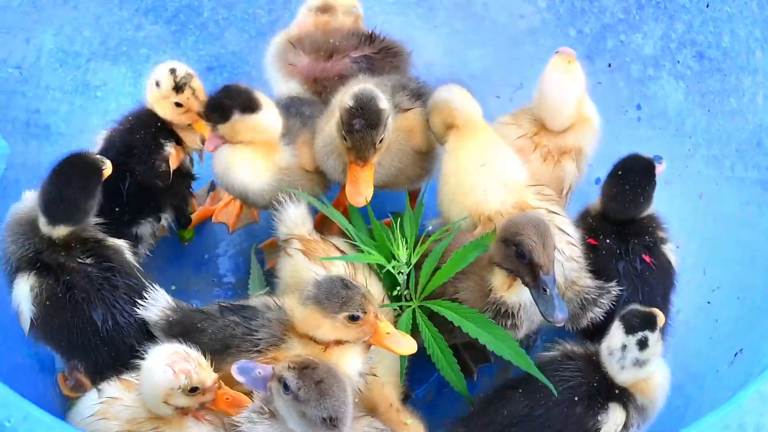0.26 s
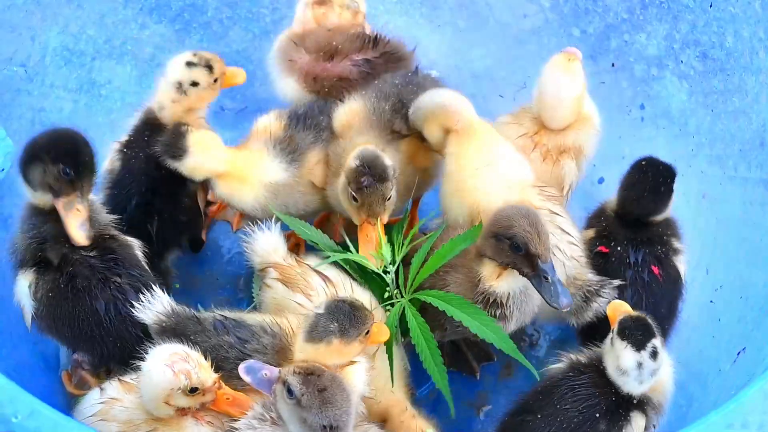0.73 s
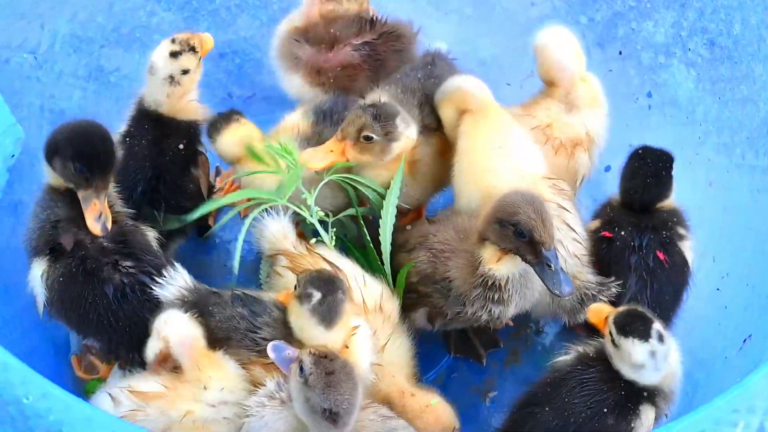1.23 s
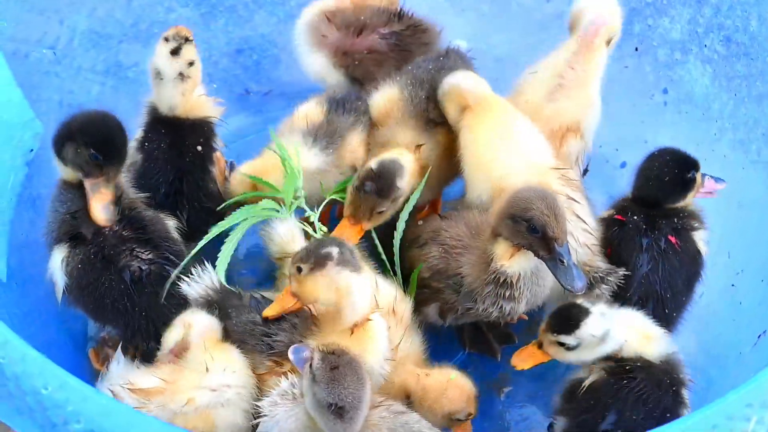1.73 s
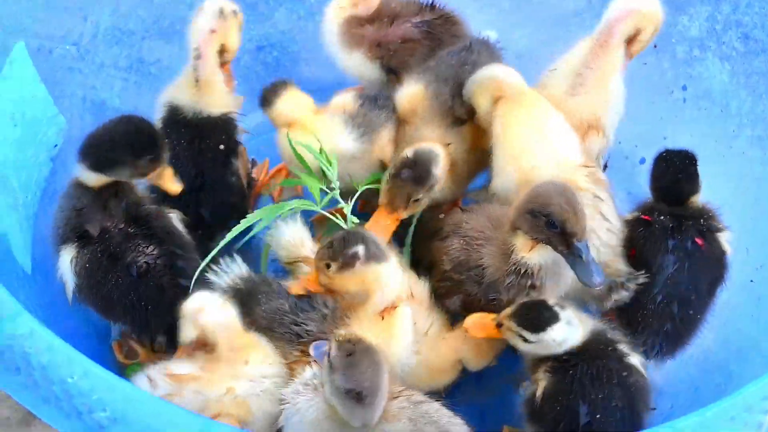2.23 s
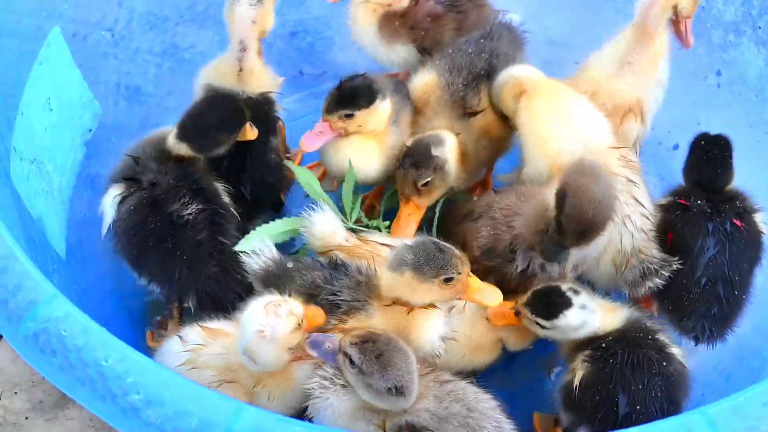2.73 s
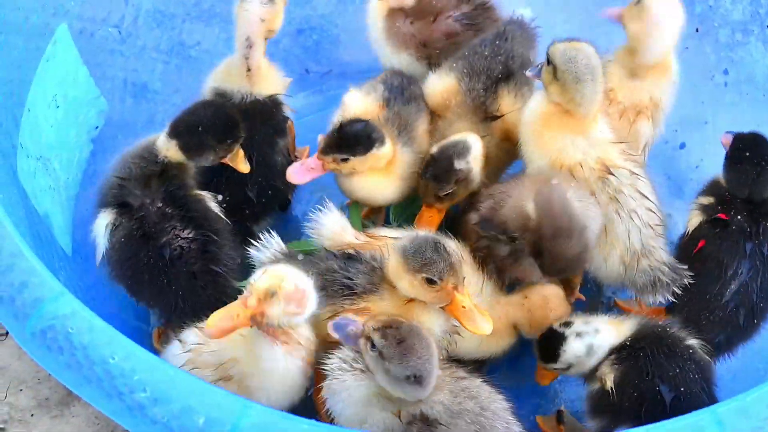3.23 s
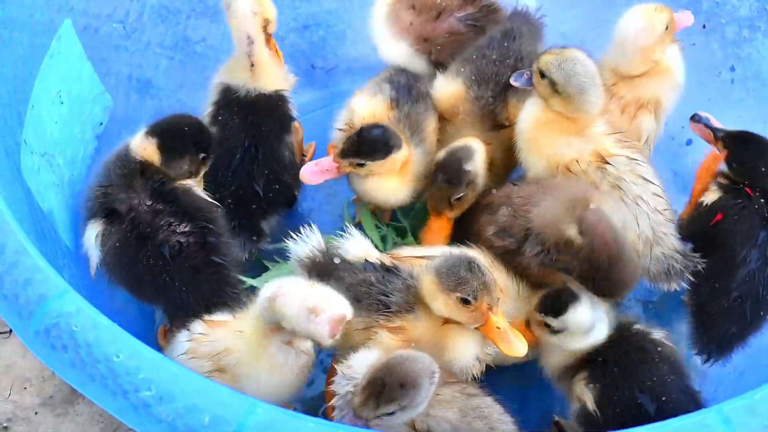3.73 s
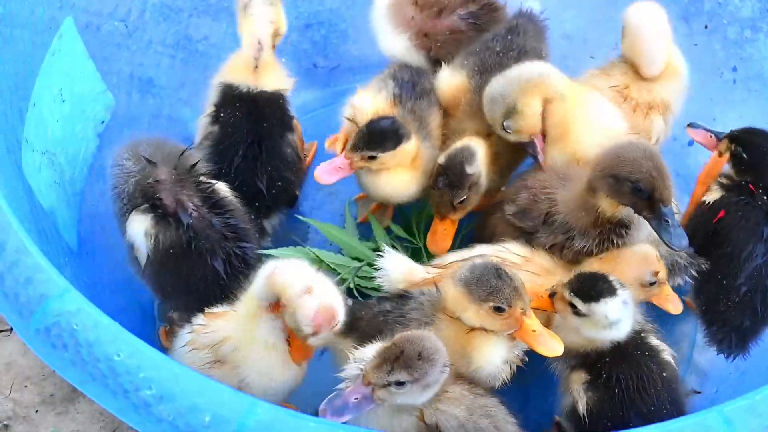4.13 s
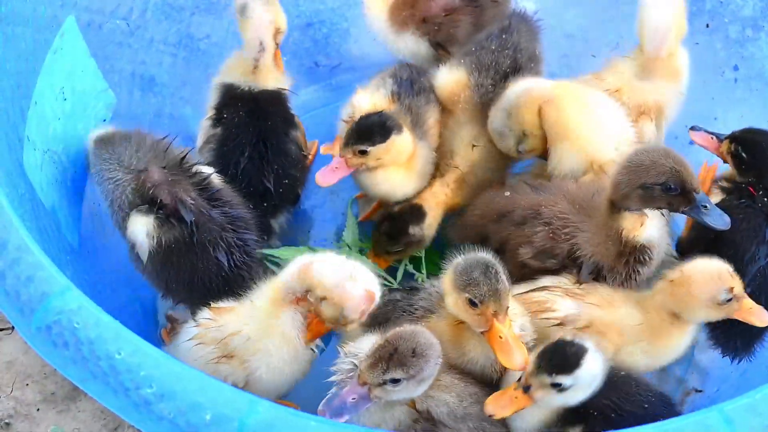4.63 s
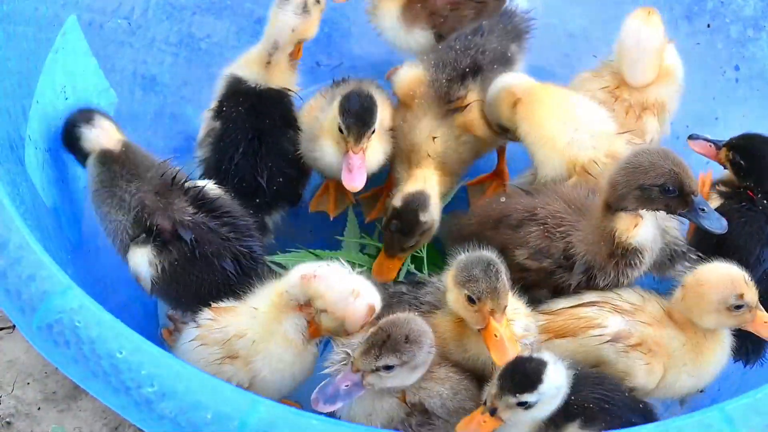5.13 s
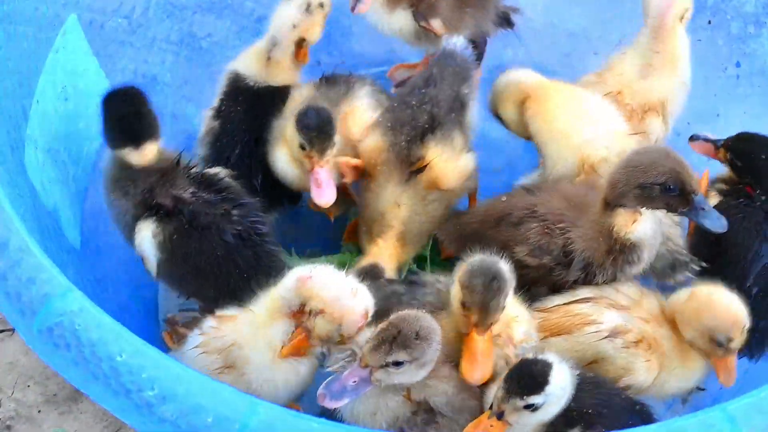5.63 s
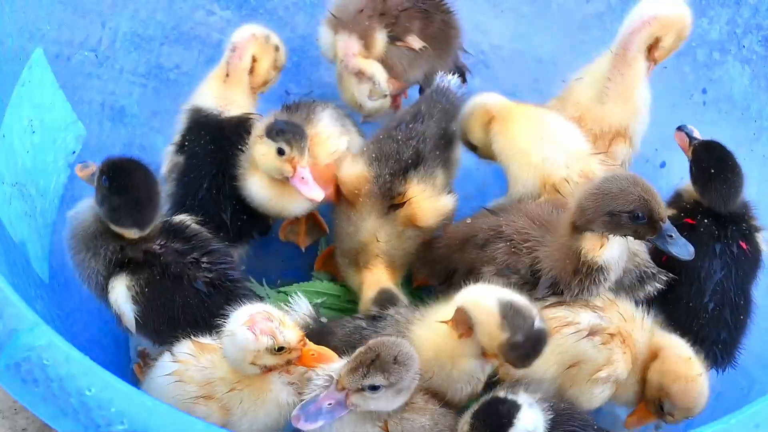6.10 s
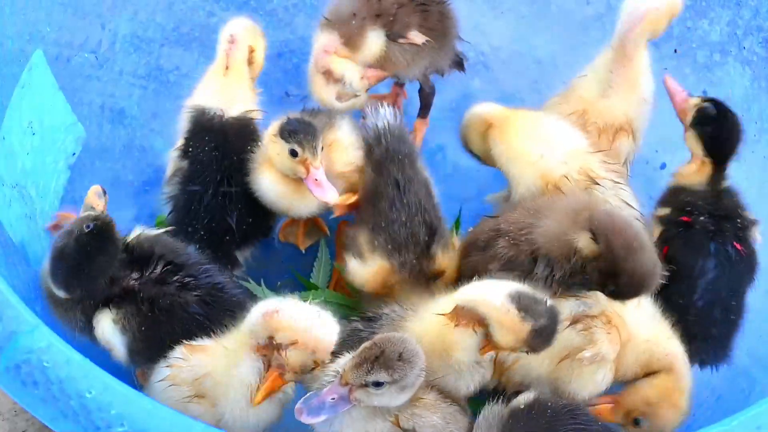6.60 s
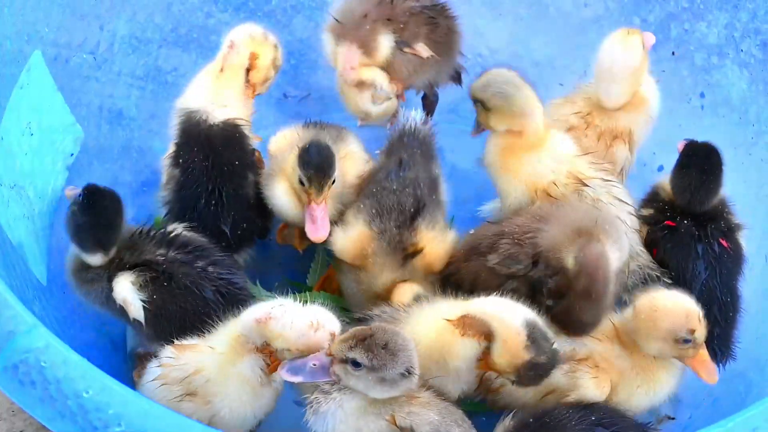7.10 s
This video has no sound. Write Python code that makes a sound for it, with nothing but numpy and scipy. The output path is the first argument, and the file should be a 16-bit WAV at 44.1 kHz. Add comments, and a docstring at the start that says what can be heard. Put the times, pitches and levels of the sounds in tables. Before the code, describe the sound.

A quiet yard with a very faint low motor hum and soft hiss. A weak hoarse duckling rasp comes at 0.4 s, then a rapid run of even, fizzy ticks from 0.7 to 1.3 s as the hiss swells and subsides. Hoarse, falling peeps on the right begin at 0.8 s, with warbles at 1.1 and 2.05 s; taps and a grainy scrape sound on the plastic tub, clearest around 2.0-2.4 s. Three bright squeaks follow at 2.9, 3.1 and 3.4 s, with a rasp between. From 3.15 s a distant songbird gives low buzzing trills, then from 3.7 s high hooked whistles, steady pipes, chips, sweeps and twirls, echoing softly. Hollow double taps come at 4.5 s. Around 6 s its notes drop; at 6.6 s a rougher trill coincides with a firm knock and snaps. Thin rising and slashing whistles continue to the end.

```python
"""Ducklings give arched, gliding and hoarse peeps in a plastic tub, with taps and scrapes on its wall.
A songbird some way off whistles high gliding notes and throbs low buzzing trills that the yard echoes.
Bright noise bursts make snaps and a run of even ticks; drifting sines hum as a distant motor.
Coloured noise makes the quiet yard and a broad hiss that swells briefly, then fades away."""
import sys
import numpy as np
from scipy import signal
from scipy.fft import rfft, irfft
from scipy.io import wavfile
from scipy.ndimage import uniform_filter1d

SR = 44100
rng = np.random.default_rng(int(sys.argv[2]) if len(sys.argv) > 2 else 0)


def persist_wave(psi):
    """Save psi, clipped to +-1, as 16-bit WAV."""
    counts = np.round(np.clip(psi, -1, 1) * 32767).astype(np.int16)
    wavfile.write(sys.argv[1], SR, np.atleast_2d(counts).T)


N = 324576  # length in samples


def ducklings():
    """Peeps, warbles and squeaks on the right and rasps in the centre, with the ring of tub and yard."""
    # arched peeps; the late ones near 6.5 and 6.9 s are probably the songbird's:
    # top t/s, start f/Hz, top f/Hz, fall/s, end f/Hz, level before pan/dB, hoarseness/rad
    arches = [(0.841, 3310, 3310, 0.1, 1940, -56.5, 1.2), (1.28, 2423, 3026, 0.055, 2266, -50, 1.4),
              (1.716, 3000, 3070, .07, 2150, -62, 0.96), (1.813, 2056, 2750, 0.026, 2090, -53.5, .3),
              (1.876, 1950, 2290, 0.014, 2030, -50.5, .3), (2.644, 2564, 3213, 0.065, 2310, -51.5, 1.56),
              (5.925, 2350, 2690, 0.024, 2590, -67.5, 0.23), (5.986, 2630, 2820, 0.015, 2320, -54, 0.12),
              (6.539, 1764, 2040, 0.014, 1860, -48, 0.23), (6.572, 3250, 4450, 0.011, 4270, -45.5, 0.42),
              (6.918, 2530, 3780, 0.015, 3580, -47.5, .3)]
    # warble falls from its top, then lifts: share of length, share of top pitch, relative level/dB
    warble = [(0, 0.71, -29), (.34, 1, -15), (.46, .88, 1), (.64, .74, 0), (.86, .78, 1), (1, .66, -9)]
    # when warbles come: t/s, length/s, top f/Hz, level before pan/dB
    warbles = [(1.111, .118, 3185, -45), (2.05, 0.117, 3293, -45.5)]
    # squeak creeps in, bursts out past its top, slides down: share of length, share of top pitch, level/dB
    squeak = [(0, .85, -30.5), (.36, 1, -22), (.44, 0.97, -2.5), (.8, .9, -3), (1, .78, -13.5)]
    # when squeaks come: t/s, length/s, top f/Hz, level before pan/dB
    squeaks = [(2.895, 0.065, 3255, -41.5), (3.126, 0.1, 3200, -39), (3.446, 0.058, 3133, -41.5)]
    # hoarse rasps: t/s, length/s, starting pitch/Hz, level/dB
    rasps = [(0.424, .11, 1400, -55.5), (3.229, 0.12, 1360, -50.5)]

    out = np.zeros((2, N))
    calls = [peep(*row) for row in arches]
    calls += [(sung(warble, *row), 0.2) for row in warbles]
    calls += [(sung(squeak, *row), 0.2) for row in squeaks]
    for glide, hoarse in calls:
        start, sound = whistle(glide, octave_db=-29.5, flutter_db=2.5, hoarse=hoarse)
        add(out, start, sound, pan_db=-8)
    for s, *shape in rasps:
        add(out, s, rasp(*shape))
    return out + amp(-8) * echoes(out, t60=0.41, delay=0.0091, same=0.12)


def peep(top_s, from_hz, top_hz, fall_s, to_hz, db, hoarse):
    """The arch of a peep: pitch rounds off at the top and falls ever faster."""
    climb_s, bend = 0.022, 1.4
    up = np.linspace(-1, 0, 5)[:-1]
    down = np.linspace(0, 1, 9)
    climb_hz = top_hz + (from_hz - top_hz) * abs(up) ** bend
    fall_hz = top_hz + (to_hz - top_hz) * down ** bend
    # loudest a fifth of the way down the fall
    shape_db = np.interp(np.r_[up, down], [-1, 0, 0.2, 1], [-9.5, -2.5, 0, -8.5])
    times = top_s + np.r_[climb_s * up, fall_s * down]
    return np.c_[times, np.r_[climb_hz, fall_hz], db + shape_db], hoarse


def rasp(length, hz, db):
    """A hoarse call: stacked harmonics of a sagging pitch, each blurred and fluttering on its own."""
    # second to fifth harmonic: mean level/dB
    harmonic_db = [1, -2, -1, -4]
    t = np.arange(0, length, 1 / SR)
    turn = 2 * np.pi * np.cumsum(hz * (1 - 0.34 * t)) / SR
    stack = np.zeros(len(t))
    for harmonic, g in enumerate(harmonic_db, start=2):
        flutter = amp(g + 4 * wobble(len(t), size=150))
        stack += flutter * np.sin(harmonic * turn + 1.3 * wobble(len(t), size=50))
    return amp(db) * np.sin(np.pi * (t / length) ** 0.65) * stack


def whistle(rows, octave_db, flutter_db, hoarse):
    """A gliding near-sine with its octave; slow flutter of level and quick phase hoarseness blur it."""
    s, hz, db = np.transpose(rows)
    t = np.arange(s[0] - 0.005, s[-1] + 0.0025, 1 / SR)
    glide_hz = smooth(np.interp(t, s, hz), size=70)
    turn = 2 * np.pi * np.cumsum(glide_hz) / SR + hoarse * wobble(len(t), size=60)
    to_edge = np.minimum(t - t[0], t[-1] - t)
    edge = np.sin(np.pi / 2 * np.clip(to_edge / 0.0025, 0, 1)) ** 2  # 2.5 ms fades
    level_db = smooth(np.interp(t, s, db), size=70) + flutter_db * wobble(len(t), size=90)
    tone = np.sin(turn) + amp(octave_db) * np.sin(2 * turn)
    return t[0], np.sqrt(2) * amp(level_db) * edge * tone


def sung(shape, s, length, hz, db):
    """Fits a syllable to the time, length, pitch and level of one note."""
    return np.array(shape) * [length, hz, 1] + [s, 0, db]


def songbird():
    """Gliding whistled notes and low trills from afar, blurred by echoes."""
    # notes under each syllable name: t/s, length/s, pitch/Hz, level/dB
    song = { "hook": [(3.825, 0.074, 6900, -41.5), (3.94, 0.07, 6890, -43), (4.05, .075, 6940, -41.5)],
            "pipe": [(4.192, 0.081, 5106, -36.5), (4.322, 0.067, 5018, -35.5), (4.45, 0.087, 5030, -38.5),
            (6.152, 0.03, 5670, -48.5), (6.325, .025, 5830, -51)], "chip": [(4.588, 0.021, 4386, -39),
            (4.758, 0.019, 4140, -37.5), (4.938, 0.031, 4090, -38.5)], "tick": [(3.705, 0.022, 5440, -51),
            (6.515, 0.028, 5690, -54.5), (6.708, 0.027, 6620, -52), (6.945, 0.02, 6460, -54.5),
            (7.192, 0.028, 6420, -63.5)], "crest": [(4.625, 0.065, 6820, -43), (4.8, 0.051, 6780, -37.5),
            (4.988, .06, 6717, -37)], "sweep": [(5.128, .127, 6976, -38)],
            "twirl": [(5.355, 0.12, 5734, -41), (5.562, 0.13, 5735, -42.5), (5.78, .125, 5650, -44.5)],
            "drop": [(6.02, 0.068, 6490, -39), (6.186, 0.065, 6460, -40), (6.358, 0.07, 6480, -41)],
            "rise": [(6.752, 0.068, 5160, -45), (6.985, 0.065, 4940, -46.5), (7.23, .064, 5070, -48)],
            "slash": [(6.595, 0.058, 6620, -49), (6.817, 0.019, 7360, -55), (7.05, 0.029, 7000, -56),
            (7.3, 0.03, 6720, -55)], }
    # shape of each syllable: share of length, share of the note's pitch, relative level/dB
    syllables = { "hook": [(0, 0.72, -18), (.35, 0.97, -7), (.56, 0.97, -5.5), (.76, .85, -2),
                 (1, .775, -.5)], "pipe": [(0, 0.84, -27), (.28, .97, -2.5), (.55, 1, -2), (1, 1.01, -13)],
                 "chip": [(0, 1.07, -14), (.3, 1, 0.5), (.7, 1.01, -2.5), (1, 1.07, -15)],
                 "crest": [(0, .93, -8), (.3, .93, 4), (.65, 1, -2), (1, .89, -2.5)],
                 "sweep": [(0, 0.574, -5.5), (.49, .645, 1.5), (.8, 1, -1), (1, .73, 2.5)],
                 "twirl": [(0, .67, -5.5), (.23, .53, -12.5), (.43, .645, 0.5), (.75, .76, -2),
                 (.84, 1, -0.5), (1, .91, -3)], "drop": [(0, 1, -21), (.2, 0.99, -4.5), (.52, .83, -1.5),
                 (.75, .785, -10.5), (1, .77, -12)], "rise": [(0, .69, -11.5), (.38, .69, -6),
                 (.55, .78, 0.5), (.9, 0.98, -9), (1, 0.92, -10.5)], "slash": [(0, 1, -5), (1, 0.53, -4.5)],
                 "tick": [(0, 1.03, -7), (1, .98, -3)], }
    # hoarseness of the rougher syllables/rad
    blurred = {"hook": .7, "rise": .8, "slash": .9, "tick": 1.2}
    # low trills: t/s, length/s, level before make-up gain/dB, start f/Hz, end f/Hz,
    # starting throb rate/Hz, pitch swing/Hz, buzz depth at start/rad and at end/rad, release/s
    trills = [(3.1487, 0.2, -32, 1360, 1810, 106, 135, 0.13, 0.75, 0.045),
              (3.731, 0.235, -32, 1360, 1810, 106, 135, 0.09, 0.83, 0.076),
              (4.4086, 0.215, -32, 1340, 1810, 106, 135, .1, 0.87, 0.067),
              (5.0216, .22, -32, 1350, 1830, 106, 135, .1, 0.8, 0.058),
              (6.5723, 0.285, -30.5, 1712, 1702, 90, 30, .8, 0.8, 0.04)]

    high, low = np.zeros((2, 2, N))
    for name, notes in song.items():
        for note in notes:
            glide = sung(syllables[name], *note)
            add(high, *whistle(glide, octave_db=-60, flutter_db=2.5, hoarse=blurred.get(name, 0.24)))
    for s, *shape in trills:
        add(low, s, trill(*shape))
    high[1] = np.roll(high[1], 1)  # one sample late on the right: the notes sit a little to the left
    high = high + amp(-5.5) * echoes(high, t60=0.33, delay=0.004, same=0.43)
    return high + low + amp(-7) * echoes(low, t60=0.24, delay=0.004, same=0.25)


def trill(length, db, from_hz, to_hz, rate, swing_hz, buzz_from, buzz_to, release):
    """Throbbing low FM tone with a faster buzz; throbs slow and fill in only where the buzz grows."""
    t = np.arange(0, length, 1 / SR)
    rise = np.sin(np.pi / 2 * t / length)
    grown = (buzz_to - buzz_from) * rise ** 2  # stays zero in the last trill, whose throb rate holds

    beat = 2 * np.pi * np.cumsum(rate * (1 - 0.3 * grown)) / SR + 0.14 * wobble(len(t), size=500)
    pulse = np.cos(beat - 0.55 * np.cos(beat))  # lopsided: builds and cuts off
    hz = from_hz + (to_hz - from_hz) * rise + swing_hz * pulse
    throb = (0.56 + 0.44 * pulse) ** (1.3 - 0.7 * buzz_from - 1.3 * grown)
    throb *= amp(1.5 * wobble(len(t), size=200))

    # the buzz rate arches over the trill and swings with each throb
    spread = (0.55 + 0.45 * np.sin(np.pi * t / length) ** 0.4) * (1 + 0.35 * np.sin(beat))
    shake = (buzz_from + grown) * np.sin(2 * np.pi * np.cumsum(360 * spread) / SR)

    swell = np.clip(np.minimum(t / 0.068, (length - t) / release), 0, 1) ** 1.2  # 68 ms attack
    turn = 2 * np.pi * np.cumsum(hz) / SR + shake + 0.33 * wobble(len(t), size=36)
    throat_low = signal.butter(2, 1100, "high", fs=SR, output="sos")
    throat_high = signal.butter(7, 2250, fs=SR, output="sos")
    voice = signal.sosfilt(np.r_[throat_low, throat_high], swell * throb * np.sin(turn))
    return amp(db + 6.5) * voice  # with make-up gain


def tub():
    """Taps of feet and bills and grainy scrapes on the plastic wall, with its echoing ring."""
    # taps: t/s, main ring gain/dB, main ring f/Hz
    taps = [(1.007, -26.5, 850), (1.055, -33.5, 1440), (2.083, -22.5, 1020), (2.3285, -18, 1420),
            (2.3505, -22.5, 1300), (2.58, -34, 786), (2.649, -36.5, 470), (2.924, -36, 1150),
            (4.543, -21, 867), (4.605, -22.5, 860), (4.663, -33.5, 893), (4.895, -31.5, 937),
            (6.665, -16, 836), (7.331, -28, 784)]
    # scrapes, and at 3.104 s a faint, breathy lead-in peep near 3 kHz:
    # t/s, length/s, level/dB, centre f/Hz, width/Hz
    scrapes = [(1.259, 0.13, -47, 1220, 1190), (2.036, 0.38, -52, 5140, 1570),
               (2.072, .28, -50, 1420, 1630), (2.104, 0.16, -48, 2620, 1080), (3.104, 0.11, -52, 3100, 900)]
    out = np.zeros((2, N))
    for s, db, hz in taps:
        add(out, s, amp(db) * tap(hz), pan_db=-1.5)
    for s, length, db, hz, width in scrapes:
        add(out, s, amp(db) * scrape(length, hz, width))
    return out + amp(-2) * echoes(out, t60=0.33, delay=0.0044, same=0.77)


def tap(hz):
    """A struck wall rings in decaying modes: the main one, one below it and a low one."""
    # low mode of the wall: f/Hz, level/dB, t60/s
    wall_mode = [(289, -26, 0.046)]
    t = np.arange(4000) / SR
    modes = [(hz, 0, 0.01), (0.72 * hz, -6, 0.01)] + wall_mode
    ring = sum(amp(g - 60 * t / t60) * np.sin(2 * np.pi * f * t) for f, g, t60 in modes)
    return ring * np.minimum(t / 0.002, 1) ** 2  # 2 ms onset


def scrape(length, hz, width):
    """Grainy, breathy noise in one band under a single stroke."""
    size = round(length * SR)
    grain_db = 2.7 * evened(uniform_filter1d(rng.standard_normal(size), size=150))
    grains = rng.standard_normal((2, size)) * amp(grain_db)
    grains[1] = 0.73 * grains[0] + 0.93 * grains[1]  # partly alike in both channels
    band = 1 / (1 + ((np.fft.rfftfreq(size, 1 / SR) - hz) / (width / 2)) ** 4)
    stroke = np.sin(np.pi * np.linspace(0, 1, size) ** 0.7) ** 2
    return stroke * evened(irfft(rfft(grains) * band, size))


def snaps():
    """Bright snaps of bills and droplets: high-passed noise bursts with a fizzy tail."""
    # snaps: t/s, gain/dB
    snap_times = [(4.2479, -39), (5.336, -38), (6.453, -40), (6.533, -43.5), (6.594, -43.5),
                  (6.6638, -32.5), (7.064, -50.5)]
    out = np.zeros((2, N))
    t = np.arange(9000) / SR
    high = signal.butter(2, 10500, "high", fs=SR, output="sos")
    decay = amp(-60 * t / 0.02) + amp(-19 - 60 * t / 0.35)
    for s, db in snap_times:
        burst = rng.standard_normal((2, len(t))) * decay
        add(out, s, amp(db) * np.minimum(t / 0.002, 1) * signal.sosfilt(high, burst))
    return out


def ticks():
    """A run of even treble ticks: band-passed noise bursts with a fizzy tail."""
    # gain along the run: t/s, gain/dB
    tick_gain = [(.67, -93), (.84, -29.5), (.94, -34.5), (1.28, -49)]
    first_s, gap_s = 0.6749, 0.0424
    out = np.zeros((2, N))
    t = np.arange(9000) / SR
    band = signal.butter(3, [6700, 9500], "band", fs=SR, output="sos")
    decay = amp(-60 * t / 0.025) + amp(-13 - 60 * t / 0.16)
    for s in first_s + gap_s * np.arange(15):
        burst = rng.standard_normal((2, len(t))) * decay
        gain_db = np.interp(s, *np.transpose(tick_gain))
        add(out, s, amp(gain_db) * signal.sosfilt(band, burst))
    return out


def motor():
    """Orders of a far motor: sines wavering in pitch, the higher ones fading faster."""
    # orders: mean f/Hz, starting peak level/dB
    orders = [(40, -75), (77, -71.5), (140, -74), (164, -72.5)]
    t = np.arange(N) / SR
    hum = np.zeros(N)
    for hz, db in orders:
        drift = evened(uniform_filter1d(rng.standard_normal(N), size=6000))
        turn = 2 * np.pi * np.cumsum(hz * (1 + 0.015 * drift)) / SR
        hum += amp(db - 0.012 * hz * t) * np.sin(turn)
    return hum


def hiss():
    """Broad, wide noise that swells briefly and then fades away."""
    # colour: f/Hz, relative density/dB
    colour = [(180, -37.5), (300, -16), (720, -9), (1220, -2.5), (2170, -7.5), (2830, -9.5), (15500, -12.5)]
    # fade: t/s, level/dB
    fade = [(0, -55.5), (.65, -58.5), (.9, -54), (1.3, -53.5), (1.6, -61), (2.7, -64), (3.5, -69),
            (4.5, -78), (7.4, -89)]
    level_db = np.interp(np.arange(N) / SR, *np.transpose(fade))
    return amp(level_db) * noise(colour, same=0.15, patchy_db=2.3)


def yard():
    """Steady quiet air of the yard: mostly low noise, nearly alike in both channels."""
    # colour: f/Hz, relative density/dB
    colour = [(15, -42), (25, -7.5), (96, -7.5), (443, -21), (1830, -21.5), (2300, -22), (2990, -18.5),
              (6500, -45)]
    return amp(-73) * noise(colour, same=0.97, patchy_db=2.5)


def noise(spectrum, same, patchy_db):
    """Two channels of rms-1 coloured noise with drifting patches, built from random spectra."""
    hz = np.fft.rfftfreq(1024, 1 / SR)
    a, b, c, d, patches = rng.standard_normal((N // 256 + 5, 513, 5)).T
    patches = evened(uniform_filter1d(uniform_filter1d(patches, size=14, axis=0), size=10, axis=1))
    f, db = np.transpose(spectrum)
    left = a + 1j * b
    right = same * left + np.sqrt(1 - same ** 2) * (c + 1j * d)
    colour_db = np.interp(np.log(hz + 1), np.log(f), db)[:, None]
    z = np.array([left, right]) * amp(colour_db + patchy_db * patches)
    return evened(signal.istft(z, nperseg=1024, noverlap=768)[1][:, :N])


def echoes(x, t60, delay, same):
    """A dying tail of sparse reflections, partly alike in both channels."""
    t = np.arange(SR // 2) / SR
    taps = rng.standard_normal((2, len(t))) * (rng.random((2, len(t))) < 0.1)
    taps[1] = same * taps[0] + np.sqrt(1 - same ** 2) * taps[1]
    taps *= amp(-60 * t / t60) * (t > delay)
    flutter = amp(2.8 * wobble(N, size=130))  # a slow random flutter of level roughens the tail
    return flutter * signal.fftconvolve(x, taps / np.linalg.norm(taps[0]), axes=1)[:, :N]


def add(mix, s, sound, pan_db=0):
    """Lays a sound into both channels at time s; a negative pan leans right."""
    part = mix[:, max(round(s * SR), 0):][:, :sound.shape[-1]]
    part += sound[..., :part.shape[1]] * amp([[pan_db / 2], [-pan_db / 2]])


def amp(db):
    """Decibels to gain."""
    return 10 ** (np.asarray(db) / 20)


def evened(x):
    """Scales to rms 1."""
    return x / np.sqrt(np.mean(x ** 2) + 1e-20)


def smooth(x, size):
    """Three running means in a row: a steep low-pass."""
    return uniform_filter1d(uniform_filter1d(uniform_filter1d(x, size), size), size)


def wobble(count, size):
    """Smoothed random motion of rms 1, slower for a larger size in samples."""
    return evened(smooth(rng.standard_normal(count), size))


def scene():
    """All sources at the microphone."""
    return ducklings() + songbird() + tub() + snaps() + ticks() + motor() + hiss() + yard()


def record(dry):
    """The band limit of the recorder: a steep low-pass at 15.8 kHz."""
    lowpass = signal.firwin(511, 15800, window=("kaiser", 9), fs=SR)
    return signal.oaconvolve(dry, lowpass[None], "same")


dry = scene()
out = record(dry)
persist_wave(out)
```